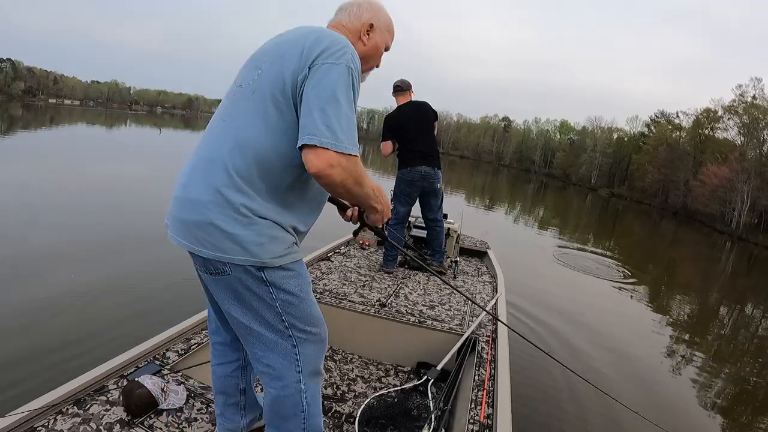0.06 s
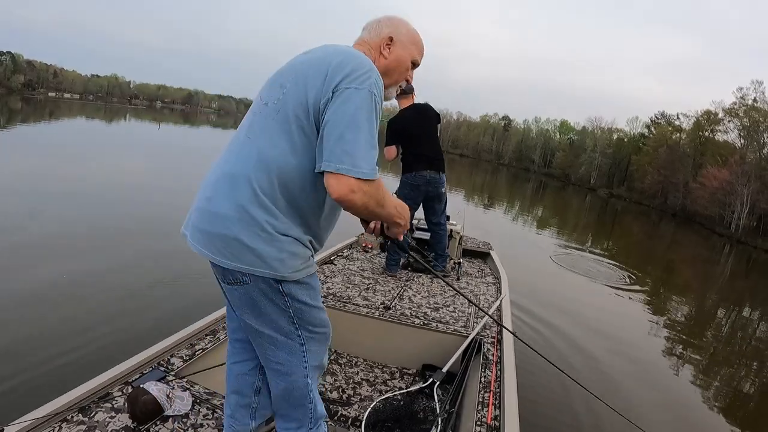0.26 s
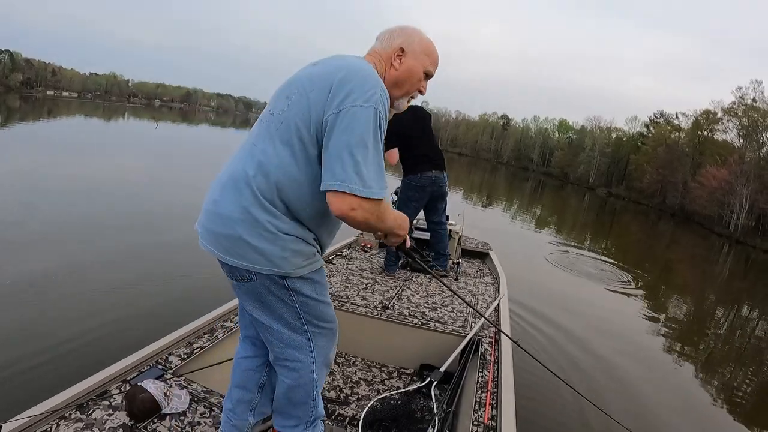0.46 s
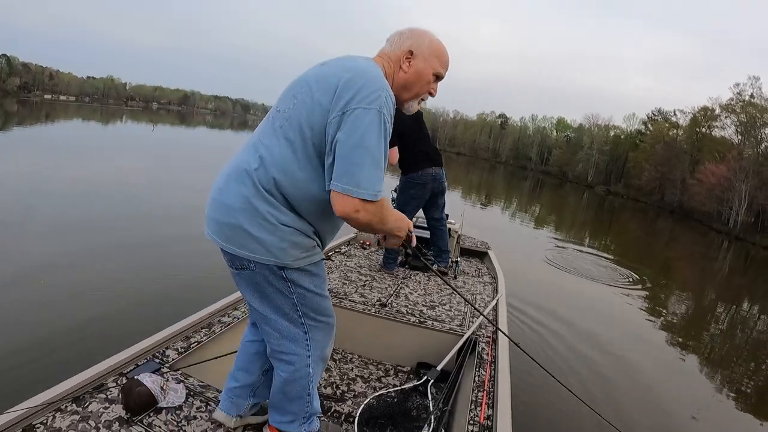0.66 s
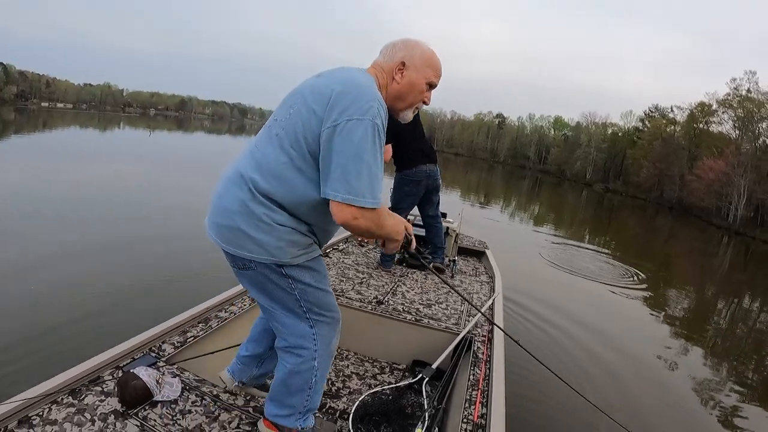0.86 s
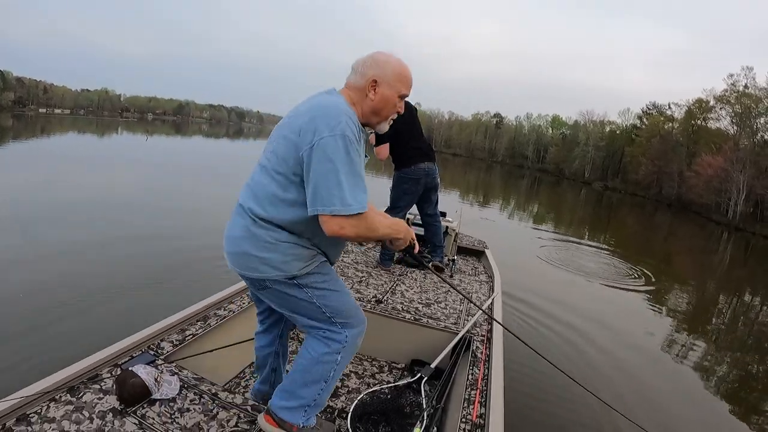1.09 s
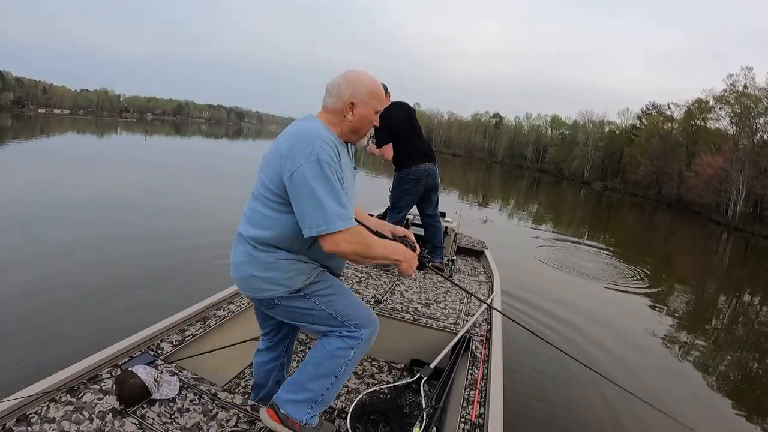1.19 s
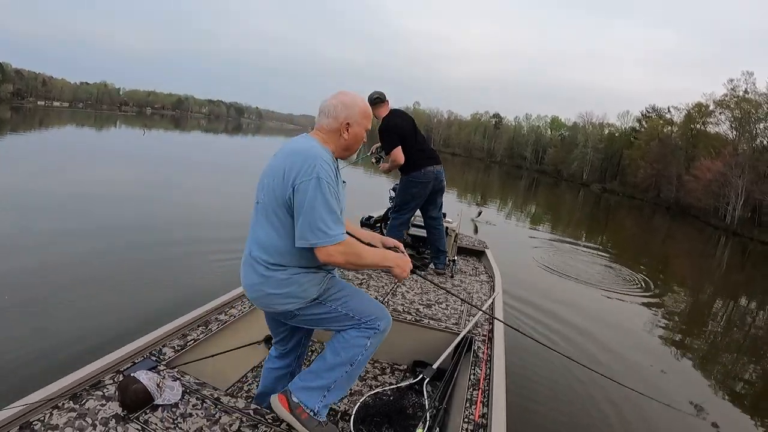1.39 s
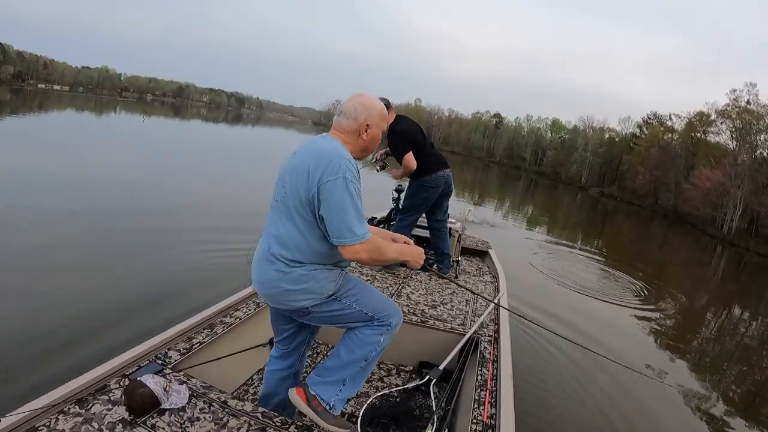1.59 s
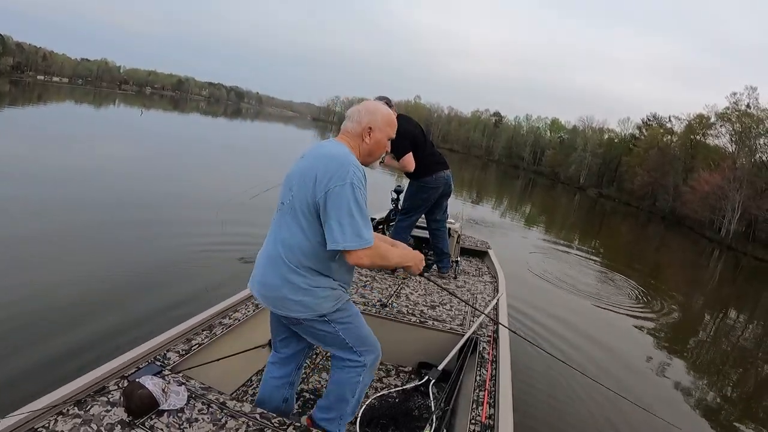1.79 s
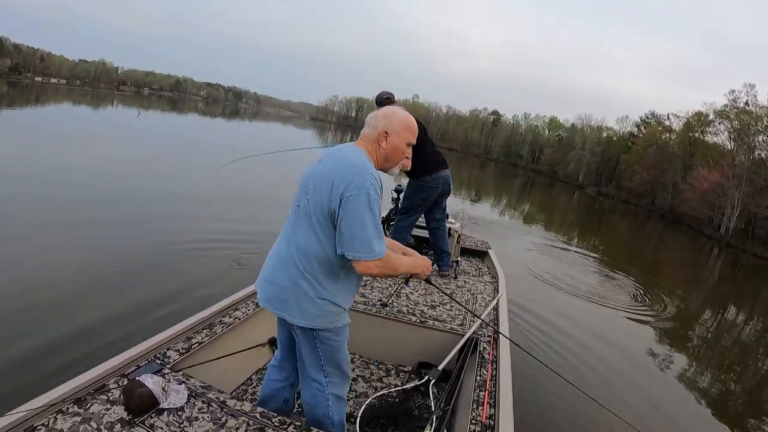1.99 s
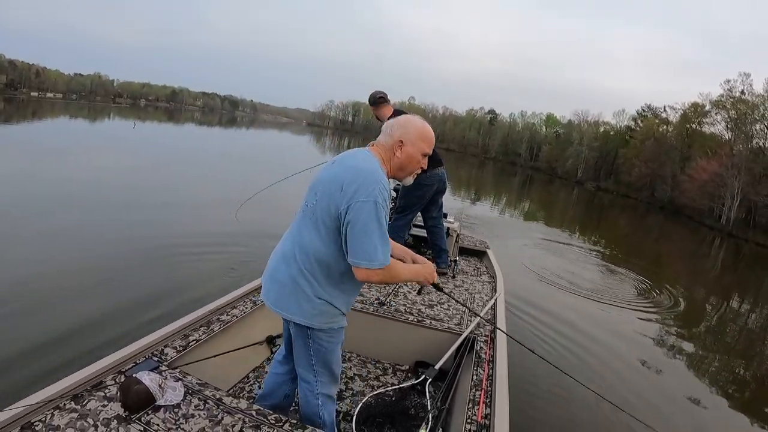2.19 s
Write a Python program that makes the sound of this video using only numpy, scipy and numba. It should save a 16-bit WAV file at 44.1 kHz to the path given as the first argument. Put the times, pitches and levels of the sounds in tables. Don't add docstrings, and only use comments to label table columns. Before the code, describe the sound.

Knocks on a metal boat hull: one sharp and rattling, then dull footfalls, over low hum and lapping water

```python
import sys
import numpy as np
from scipy import signal
from scipy.fft import next_fast_len
from scipy.io import wavfile
from scipy.ndimage import uniform_filter1d
from numba import njit

SR = 44100
rng = np.random.default_rng(int(sys.argv[2]) if len(sys.argv) > 2 else 0)


def to_wav(sig):
    pcm = np.clip(np.atleast_2d(sig), -1, 1) * 32767
    pcm = np.round(pcm).astype(np.int16)
    wavfile.write(sys.argv[1], SR, pcm.T)


def attenuation_scalar(level_db):
    decades = np.asarray(level_db, float) / 20
    return 10 ** decades


N = 99225
TIME = np.arange(N) / SR
OPPOSITE = np.array([[1], [-1]])


def read(table, hz):
    table = np.array(table)
    return np.interp(np.log(hz), np.log(table[:, 0]), table[:, 1])


def unit(x):
    return x / np.sqrt(np.mean(x ** 2))


def band(x, hz, width):
    return signal.lfilter(*signal.iirpeak(min(hz, .45 * SR), max(hz / width, .3), fs=SR), x)


def band_noise(hz, width):
    return unit(band(band(rng.standard_normal(N), hz, width), hz, width))


def steep_lowpass(x, hz):
    return signal.sosfilt(signal.butter(4, hz, fs=SR, output="sos"), x)


def walk(rate):
    hold = max(int(SR / rate), 2)
    steps = np.repeat(rng.standard_normal(4000), hold)[:N + hold]
    return unit(uniform_filter1d(uniform_filter1d(steps, hold), hold)[:N])


def decay(start, t60, attack=0.0014):
    t = np.maximum(TIME - start, 0)
    rise = 1 - np.exp(-t / max(attack, 1e-5))
    return t, rise * attenuation_scalar(-60 * t / max(t60, .001))


def ring(start, hz, db, t60, push):
    t, env = decay(start, t60, push)
    return attenuation_scalar(db) * env * np.sin(2 * np.pi * hz * t)


def noise_tail(start, table):
    return sum(attenuation_scalar(db) * decay(start, t60)[1] * band_noise(hz, .8 * hz) for hz, db, t60 in table)


@njit
def grains(out, at, hz, t60, size, glide, attack, sr):
    for k in range(len(at)):
        phase, n = 0., int(t60[k] * sr)
        for i in range(min(n, len(out) - at[k])):
            phase += 2 * np.pi * hz[k] * (1 + glide * i / n) / sr
            env = (1 - np.exp(-i / attack)) * np.exp(-np.log(1000) * i / n)
            out[at[k] + i] += size[k] * env * np.sin(phase)
    return out


# pitch_hz, level_db [dB per Hz]
HUM_SPECTRUM = [(12, -31), (20, -17), (36, 5), (65, -2.5), (97, 0.5), (155, -8), (184, -9.5), (206, -9.5),
                (420, -25.5), (550, -64), (920, -120)]


def hum():
    out = 0
    for hz in 22 * 2 ** np.arange(0, 4.4, 1 / 3):
        mid, side = band_noise(hz, hz / 3), band_noise(hz, hz / 3)
        db = read(HUM_SPECTRUM, hz) + 10 * np.log10(hz) + 1.16 * walk(11.79)
        out = out + attenuation_scalar(db) * (mid + attenuation_scalar(-22.5) * side * OPPOSITE)
    return attenuation_scalar(-40.5) * unit(out)


def hiss():
    hz, level_db = 12200, -71.5
    return attenuation_scalar(level_db) * unit(band(rng.standard_normal((2, N)), hz, hz)) * attenuation_scalar(2.5 * walk(49.3))


# start_s, level_db
SPLASH_LEVEL = [(0, -50.5), (.1, -50), (.35, -51.5), (.7, -52.5), (.95, -48), (1.1, -49.5), (1.3, -47.5),
                (1.44, -41), (1.52, -42.5), (1.57, -42), (1.66, -42), (1.77, -44), (1.83, -40),
                (1.99, -43.5), (2.1, -42), (2.25, -42.5)]
# pitch_hz, level_db [dB per Hz]
SPRAY_SPECTRUM = [(280, 9.5), (450, 2), (700, -0.5), (1100, 3.5), (1700, 1.5), (4600, 1.5), (9400, -8),
                  (15500, -16.5)]
# pitch_hz, side_db [dB relative to mid]
SPRAY_WIDTH = [(250, -8), (500, -9), (2000, -4.5), (4500, -4.5), (8000, -10), (13000, -1)]


def spray():
    out, surge = 0, walk(60.54)
    for hz in 280 * 2 ** np.arange(0, 5.9, 1 / 3):
        mid, side = band_noise(hz, hz / 3), band_noise(hz, hz / 3)
        db = read(SPRAY_SPECTRUM, hz) + 10 * np.log10(hz) + 2.4 * surge + 1.8 * walk(90)
        out = out + attenuation_scalar(db) * (mid + attenuation_scalar(read(SPRAY_WIDTH, hz)) * side * OPPOSITE)
    return out


def bubbles():
    per_s, cycles, spread_db = 1300, 10.8, 3
    when, pitch, strength, length, place = rng.random((5, int(per_s * N / SR)))
    at = (when * (N - 1)).astype(int)
    hz = 450 * 2 ** (4.6 * pitch ** .8)
    size = attenuation_scalar(read(SPRAY_SPECTRUM, hz) + 10 * np.log10(hz) - spread_db * np.log(strength + 0.012))
    t60 = 3.5 * cycles * (1.14 + 1.19 * length) / hz
    pan = attenuation_scalar(8.3 * (place - .5))
    return np.array([grains(np.zeros(N), at, hz, t60, size * g, 0.268, 1.3, 1. * SR) for g in (pan, 1 / pan)])


def splash():
    level = attenuation_scalar(np.interp(TIME, *np.array(SPLASH_LEVEL).T))
    return level * unit(unit(spray()) + attenuation_scalar(-0.5) * unit(bubbles()))


# pitch_hz, width_hz, level_db
REEL_MODES = [(1520, 1800, -4), (2370, 1000, -6.5), (4900, 670, -2), (5180, 470, -9.5), (6840, 350, -9),
              (9900, 780, -11), (12500, 600, -15)]


def reel():
    per_s, level_db, t60_s, stops_s, scatter_db = 31, -49.5, 0.019, 1.6, 6
    chance = rng.standard_normal((1 + len(REEL_MODES), 120))
    start = .014 + (np.arange(120) + .12 * chance[0]) / per_s
    heard = start < stops_s
    fade, out = attenuation_scalar(-60 / (t60_s * SR)), 0
    for (hz, width, db), colour in zip(REEL_MODES, chance[1:]):
        ticks = np.zeros(N)
        ticks[(start[heard] * SR).astype(int)] = attenuation_scalar(db + scatter_db * colour[heard])
        env = uniform_filter1d(signal.lfilter([1], [1, -fade], ticks), size=130)
        out = out + env * band_noise(hz, width)
    return attenuation_scalar(level_db) * out


# start_s, level_db [peak], pitch_hz, t60_s
DROP_EVENTS = [(0.059, -38, 2530, 0.022), (0.104, -40.5, 1550, 0.09), (0.182, -39.5, 5200, 0.023),
               (0.403, -42, 2540, 0.02), (0.501, -34.5, 1340, 0.013), (0.582, -43, 1470, 0.018),
               (0.677, -40.5, 2530, 0.037), (0.843, -40, 5520, 0.036), (0.891, -36.5, 2260, 0.031),
               (0.934, -51, 1630, 0.053), (1.066, -32.5, 3080, 0.035), (1.174, -33, 1850, 0.013),
               (1.371, -22.5, 2100, 0.0081), (1.614, -27.5, 2770, 0.02), (1.832, -30, 1055, 0.034),
               (1.905, -24.5, 870, 0.029), (1.993, -39.5, 1000, .04), (1.996, -32, 618, 0.054),
               (2.008, -37, 764, .05), (2.046, -36, 938, 0.054), (2.058, -40, 860, 0.034),
               (2.22, -37.5, 1064, 0.041), (2.079, -34.5, 2970, 0.033), (2.122, -29, 1840, 0.027),
               (2.178, -33, 1570, 0.025)]


def drops():
    start, db, hz, t60 = np.array(DROP_EVENTS).T
    glide, attack_s = 0.039, 0.0004
    return grains(np.zeros(N), (start * SR).astype(int), hz, t60, attenuation_scalar(db - 0.5), glide, attack_s * SR, 1. * SR)


# start_s, level_db, pitch_hz, t60_s
SPLAT_EVENTS = [(0.105, -35.5, 4250, 0.031), (0.9637, -37.5, 1950, 0.093), (0.963, -36, 9700, 0.016),
                (1.194, -35.5, 4700, 0.025), (1.396, -29, 5750, 0.01), (1.416, -36, 5500, 0.028),
                (1.512, -35, 5070, 0.065), (1.532, -31.5, 3780, 0.027), (1.603, -33, 4400, 0.046),
                (1.615, -35, 4060, 0.038), (1.628, -33, 9000, 0.013), (1.619, -42, 9000, 0.027),
                (1.677, -40, 5500, 0.032), (1.6482, -35, 5500, .03), (1.696, -35, 4940, 0.013),
                (1.7, -26, 3680, .015), (1.802, -30.5, 4550, 0.054), (1.807, -37, 6400, 0.018),
                (2.018, -26.5, 6500, 0.015), (1.51, -40.5, 390, 0.24), (1.654, -41, 388, 0.28),
                (1.873, -39.5, 740, 0.2), (1.998, -41.5, 614, 0.37), (2.068, -44, 380, 0.38),
                (1.791, -45, 1050, 0.15), (2.111, -45.5, 1130, 0.19)]


def splats():
    return sum(noise_tail(start, [(hz, db, t60)]) for start, db, hz, t60 in SPLAT_EVENTS)


# start_s, level_db, pitch_hz, t60_s
TAP_EVENTS = [
    (0.1145, -26, 600, 0.013),
    (0.1215, -36.5, 600, 0.015),
    (0.1372, -36, 470, 0.096),
    (0.162, -35, 116, 0.055),
    (1.44, -31.5, 54.8, 0.48),
    (1.887, -29, 386, 0.019),
    (2.016, -48, 710, 0.081),
    (2.031, -28.5, 552, 0.027),
    (2.2, -37.5, 180.6, 0.59),
]


def taps():
    out = 0
    for start, db, hz, t60 in TAP_EVENTS:
        out = out + ring(start, hz, db, t60, .0001)
        out = out + attenuation_scalar(-8.5) * ring(start, 1.378 * hz, db, t60, .0001)
    return out


# start_s, level_db, contact_s
KNOCK_BLOWS = [
    (.2329, -15, .00012),
    (.2358, -19, .0002),
    (.2465, -23, .0004),
]
# pitch_hz, level_db, t60_s
PLATE_MODES = [(1028, -27, 0.12), (1240, -5, 0.066), (1570, -30, 0.092), (1737, -22, 0.1),
               (1958, -13, 0.11), (2095, -13, 0.073), (2280, 5.5, 0.043), (2355, -11, 0.038),
               (2702, -6.5, 0.063), (2930, -18, 0.039), (3515, -12.5, 0.12), (3320, -12, 0.093),
               (4430, -8, 0.033), (5050, 0.5, 0.0076)]
# pitch_hz, knock_db, shoe_db, t60_s
HULL_MODES = [(64.6, 13.5, -32, 0.16), (76.3, -6.5, -14, 0.67), (118, -10, -7, 0.26),
              (186.5, -10.5, -9, 0.27), (214, -10.5, -17, 0.52), (251.3, -9, -17, 0.22),
              (294.6, -18, -18.5, 0.32), (328.5, -17, -11, 0.18), (368, -10, -17, 0.15),
              (445.5, -19, -21, 0.23), (540, -22.5, -25.5, 0.24), (635, -27.5, -36, 0.25),
              (742, -13.5, -40, 0.21)]
# pitch_hz, level_db, t60_s
RATTLE_BANDS = [(294, -30.5, 0.34), (600, -34, 0.27), (980, -29, 0.28), (1570, -24.5, 0.17),
                (2120, -20.5, 0.12), (3300, -31.5, 0.2), (5500, -24, 0.025), (10700, -20.5, 0.0065)]


def knock():
    first = KNOCK_BLOWS[0][0]
    out = steep_lowpass(noise_tail(first, RATTLE_BANDS[:-1]), 6500)
    out = out + noise_tail(first, RATTLE_BANDS[-1:])
    for start, db, contact in KNOCK_BLOWS:
        for hz, mode_db, t60 in PLATE_MODES:
            softening = attenuation_scalar(-contact * hz * 7.4)
            out = out + ring(start, hz, db + mode_db, t60, contact) * softening
    for k, (hz, mode_db, _, t60) in enumerate(HULL_MODES):
        out = out + ring(first + .00015, hz, mode_db - 14, t60, 1 / hz) * (-1) ** (k // 2)
    return out


# start_s, level_db, pitch_hz, width_s
SNAP_EVENTS = [(1.64771, -12.5, 5200, .00013), (1.64782, -23, 8600, .00013), (1.6478, -35, 13000, .0001),
               (1.6501, -31, 6500, .0003), (1.7038, -28, 3800, .0003), (1.697, -33, 4000, .0002),
               (1.6142, -29, 4000, .0003), (1.6155, -38, 10500, .0003), (.2334, -14, 4200, .0002),
               (.583, -40, 1600, .0006), (.934, -36, 3000, .0004), (.9665, -31, 3000, .0003),
               (1.066, -38, 3100, .0005), (1.1955, -35, 4800, .0003), (1.805, -29, 4500, .0003),
               (1.533, -30, 3800, .0003)]


def snaps():
    out = 0
    for start, db, hz, width in SNAP_EVENTS:
        t = TIME - start
        out = out - attenuation_scalar(db) * np.exp(-.5 * (t / width) ** 2) * np.cos(2 * np.pi * hz * t)
    return out


# start_s, level_db, board_hz, swing_s, hull_db
SHOE_STEPS = [
    (1.2163, -9.5, 247.3, 0.015, -13),
    (1.9683, -19.5, 164, 0.0051, -34.5),
    (1.9744, -20, 70, 0.0107, -33),
    (1.984, -23, 148, 0.0069, -26.5),
]
# pitch_hz, level_db, t60_s
SCUFF_BANDS = [(190, -31, 0.29), (463, -31.5, 0.14), (940, -36, 0.14), (1460, -33, 0.042)]


def shoes():
    stiffening, settle_s, flattening = 1.67, 0.00175, 0.11
    out = noise_tail(SHOE_STEPS[0][0], SCUFF_BANDS) + attenuation_scalar(-26) * noise_tail(SHOE_STEPS[1][0], SCUFF_BANDS)
    for start, db, board_hz, swing, hull_db in SHOE_STEPS:
        t = np.maximum(TIME - start, 0)
        size = np.abs(np.sin(np.pi * np.minimum(t / swing, 1) ** 1.44)) ** .5
        turn = 2 * np.pi * board_hz * (t + stiffening * settle_s * (1 - np.exp(-t / settle_s)))
        out = out + attenuation_scalar(db) * size * (flattening * size * np.cos(2 * turn) - np.sin(turn))
        for k, (hz, _, mode_db, t60) in enumerate(HULL_MODES):
            out = out + ring(start, hz, hull_db + mode_db, t60, 0.0081) * (-1) ** k
    return out


def scene():
    lean_right = attenuation_scalar(-.8 * OPPOSITE)
    background = hum() + hiss()
    water = splash()
    small = reel() + drops() + splats() + taps() + snaps()
    blows = knock() + shoes()
    high = signal.sosfiltfilt(signal.butter(2, 435, "high", fs=SR, output="sos"), blows + small)
    side = attenuation_scalar(-12) * signal.hilbert(high, next_fast_len(N))[:N].imag
    return blows + lean_right * (small + water) + side * OPPOSITE + background


def roll_off(x):
    return signal.sosfilt(signal.butter(12, 16330, fs=SR, output="sos"), x)


def record(dry):
    mic = signal.sosfilt(signal.butter(2, [41.8, 10900], "band", fs=SR, output="sos"), dry)
    mix = signal.sosfilt(signal.ellip(8, .2, 60, 15800, fs=SR, output="sos"), mic)
    return roll_off(mix)


dry = scene()
out = record(dry)
to_wav(out)
```